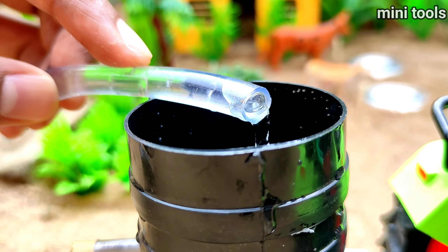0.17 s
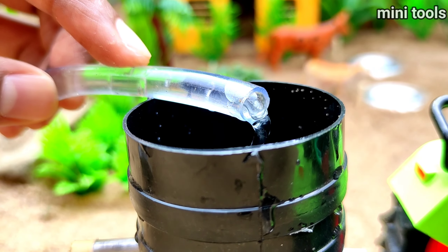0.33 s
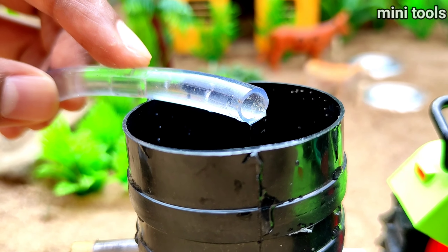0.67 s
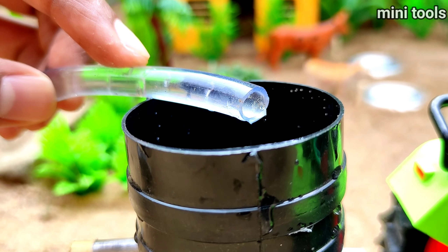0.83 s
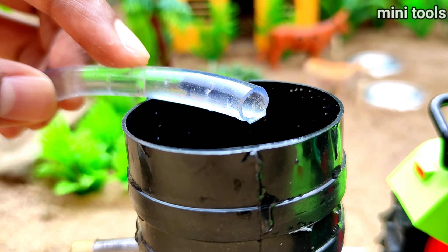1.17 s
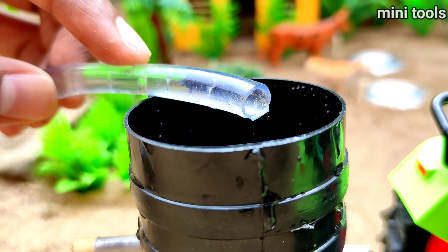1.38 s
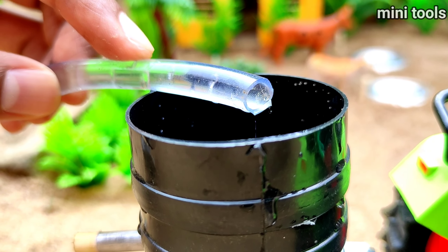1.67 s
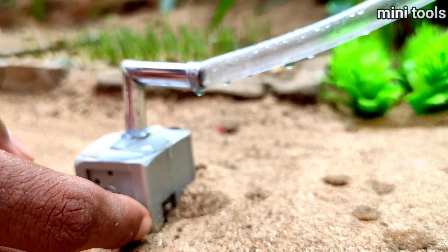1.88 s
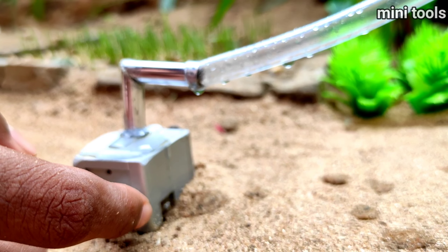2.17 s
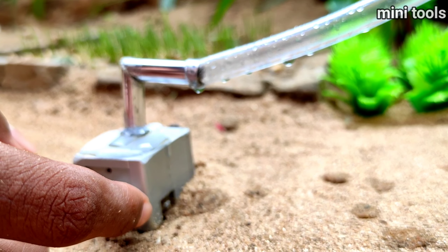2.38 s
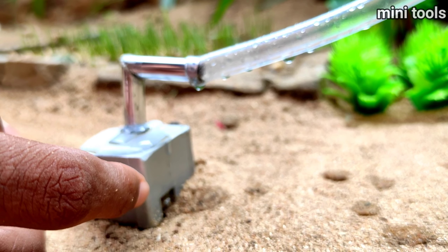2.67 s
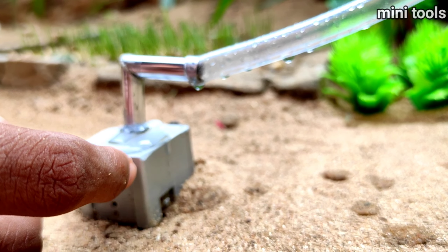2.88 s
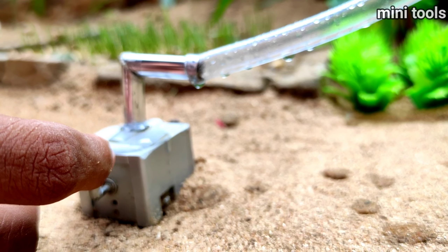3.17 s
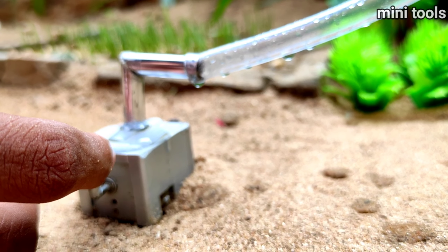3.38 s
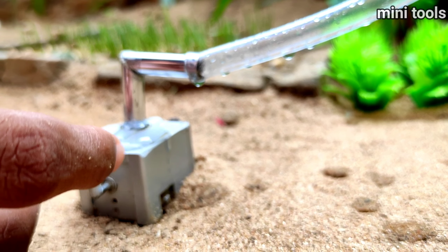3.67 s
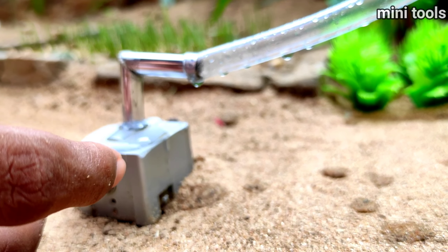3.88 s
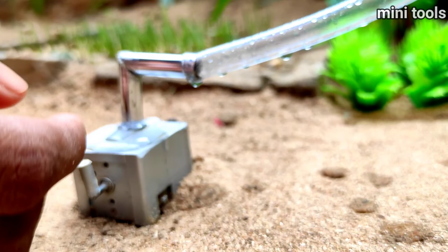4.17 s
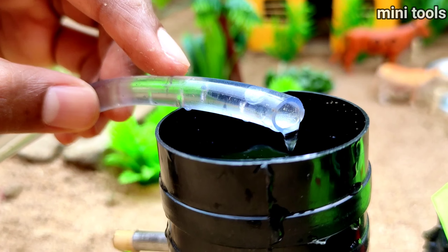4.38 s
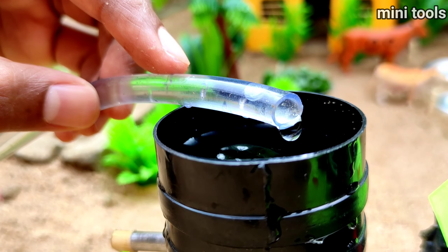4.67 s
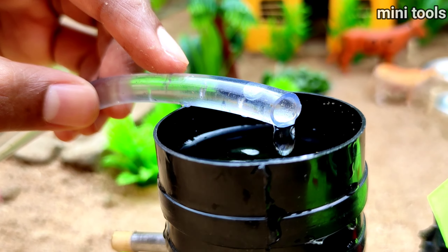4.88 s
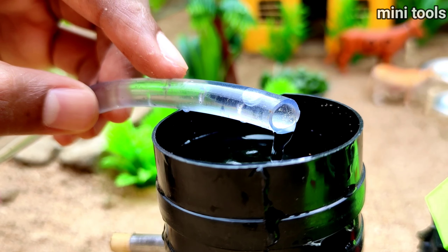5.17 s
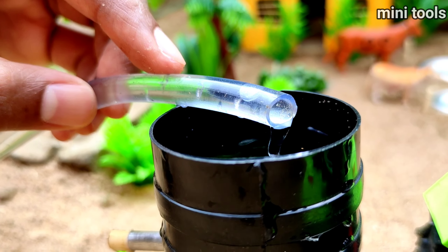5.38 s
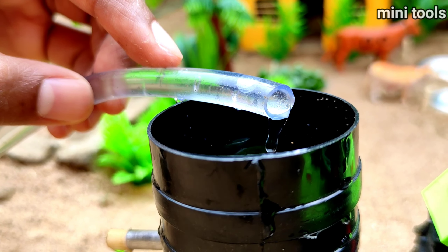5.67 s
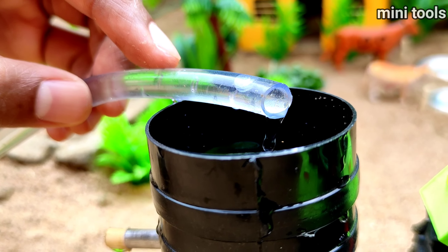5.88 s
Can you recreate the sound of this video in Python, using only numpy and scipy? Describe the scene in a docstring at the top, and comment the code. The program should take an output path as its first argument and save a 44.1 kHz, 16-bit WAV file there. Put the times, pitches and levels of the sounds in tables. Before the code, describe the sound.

Very close stereo sound of a thin water stream spurting into a small plastic tank. Bright plinks, quick bubbles and crisp droplet ticks tumble irregularly, with a short hollow ring. Gulps become deeper and fuller as the tank fills. Soft outdoor air and a faint low hum sit behind the first two seconds. After about four seconds everything fades to a barely audible trickle.

```python
"""Water spurts from a thin tube into a small plastic tank, close to a stereo microphone; it fades after four seconds.
Air bubbles are decaying sines that rise in pitch: large ones gulp, deeper and louder as the tank fills, small ones plink.
Droplets are short high rings with a noise snap and fizz. Damped air modes and noise echoes make the tank's hollow ring.
Behind: coloured outdoor noise, dull bumps, and a faint low hum and tones (sines) in about the first two seconds.
All dB values are relative levels within their layer."""
import sys
import numpy as np
from scipy import signal
from scipy.fft import rfft, irfft, next_fast_len
from scipy.io import wavfile
from scipy.ndimage import uniform_filter1d

SR = 44100
rng = np.random.default_rng(int(sys.argv[2]) if len(sys.argv) > 2 else 0)


def bounce(signal):
    """Save signal as a 16-bit WAV file at the path given by the first command-line argument."""
    frames = np.transpose(np.atleast_2d(signal))
    limited = np.clip(frames, -1, 1)
    pcm = np.round(limited * 32767).astype(np.int16)
    wavfile.write(sys.argv[1], SR, pcm)


N = 265790
TIME_S = np.arange(N) / SR


def amp(db):
    """Decibels to gain."""
    return 10 ** (np.asarray(db) / 20)


def unit(x):
    """Scales to rms 1."""
    return x / np.sqrt(np.mean(x ** 2) + 1e-20)


def curve(rows, t_s, column=1):
    """Reads one column of a table along time."""
    rows = np.asarray(rows)
    return np.interp(t_s, rows[:, 0], rows[:, column])


def read(points, hz):
    """Reads a spectrum on a log-frequency axis."""
    point_hz, value = np.transpose(points)
    return np.interp(np.log(hz + 1), np.log(point_hz + 1), value)


def add(mix, start_s, sound):
    """Mixes a sound in at start_s."""
    part = mix[max(round(start_s * SR), 0):][:len(sound)]
    part += sound[:len(part)]


def colour(x, points):
    """Filters by a spectrum in dB."""
    length = x.shape[-1]
    size = next_fast_len(length + 2048)
    gain = amp(read(points, np.fft.rfftfreq(size, 1 / SR)))
    return irfft(rfft(x, size) * gain, size)[..., :length]


def wobble(size):
    """A slow random waver of rms 1, smoothed twice over size samples."""
    smooth = uniform_filter1d(rng.standard_normal(N), size=size)
    return unit(uniform_filter1d(smooth, size=size))


# stream between splashes: (time [s], bubbling level [dB], spray level [dB])
STREAM_LEVEL = [(0, -38, -38.5), (0.6, -38, -44), (1.15, -36, -42), (1.55, -37, -39), (1.75, -35.5, -46.5),
                (2.05, -37.5, -48), (2.4, -38, -45), (3.05, -37, -42), (3.15, -41, -43.5),
                (3.72, -38.5, -43.5), (4.02, -42, -57), (4.29, -52.5, -55), (4.75, -55.5, -62.5),
                (5.15, -56.5, -65), (5.36, -63, -71), (5.55, -63.5, -73.5), (6.02, -68, -75)]
# typical pitch of large bubbles: (time [s], pitch [Hz])
GULP_PITCH_HZ = [(0, 1290), (1.1, 1140), (1.4, 1110), (2.2, 846), (3.1, 1018), (3.5, 802), (4.1, 775),
                 (4.5, 694), (6, 748)]
# typical pitch of bright plinks: (time [s], pitch [Hz])
BRIGHT_PITCH_HZ = [(0, 3120), (0.6, 2850), (1.5, 2814), (2.6, 3030), (3.4, 3100), (6, 3290)]
GULP_SWELL, PLINK_SWELL = 2.9, 1  # dB per dB of splash swell
SHALLOW_GULP_DB, DEEP_GULP_DB, FILL_S = -17.5, -3.5, 3.5  # deeper water traps more large bubbles
BRIGHT_DB, BLIPS_DB = -10.5, -11.5


def stream():
    """Slugs of water stir gulps, plinks, spray and mist; clear blips fall evenly; gulps grow as the tank fills."""
    drive = spurts(per_s=40, decay_s=0.0017, steady=0.29, slug=0.66)
    gulps = swarm(drive, curve(GULP_PITCH_HZ, TIME_S), octaves=0.787, cycles=3.8,
                  spread_db=3.5, rise=0.068, count=1700, size=1300)
    plinks = swarm(drive, 2031, octaves=2.004, cycles=4.2,
                   spread_db=2.5, rise=0.056, count=3200, size=750)
    bright = swarm(drive, curve(BRIGHT_PITCH_HZ, TIME_S), octaves=0.24, cycles=5.2,
                   spread_db=7.0, rise=0.023, count=1200, size=600, pinch=0.77)
    blips = swarm(np.ones(N), 1983, octaves=1.456, cycles=6.46,
                  spread_db=6.5, rise=0.05, count=560, size=1000, pinch=0.69)
    spray = swarm(drive, 6636, octaves=1.973, cycles=4.95,
                  spread_db=8.0, rise=0.15, count=7000, size=320)
    mist = port_noise(N, [(2500, 1.5), (4500, -1.0), (15000, -15.5)]) * drive
    spray_and_mist = unit(spray) + amp(0.5) * unit(mist)

    bubbling_swell_db, spray_swell_db = splashing()
    bubbling_db = curve(STREAM_LEVEL, TIME_S, column=1)
    depth_db = np.interp(TIME_S, [0, FILL_S], [SHALLOW_GULP_DB, DEEP_GULP_DB])
    gulp_db = bubbling_db + depth_db + GULP_SWELL * bubbling_swell_db
    plink_db = bubbling_db + PLINK_SWELL * bubbling_swell_db
    spray_db = curve(STREAM_LEVEL, TIME_S, column=2) + spray_swell_db
    return (pour(gulps, gulp_db, modes_db=5, echo_db=0.0)
            + pour(plinks, plink_db - 2.0, modes_db=2.5, echo_db=1.5)
            + pour(bright, plink_db + BRIGHT_DB, modes_db=-7, echo_db=-19.5)
            + unit(blips) * amp(plink_db + BLIPS_DB)
            + pour(spray_and_mist, spray_db, modes_db=-6, echo_db=2))


def spurts(per_s, decay_s, steady, slug):
    """The stream breaks into slugs; each hits at once and its churn decays. Each loud bubble has a slug."""
    chance, strength = rng.random((2, N))
    hits = (chance < per_s / SR) * strength
    hits[(np.array(LOUD_BUBBLES)[:, 0] * SR).astype(int)] = slug
    return steady + signal.lfilter([1], [1, -np.exp(-1 / (decay_s * SR))], hits)


# surges, some bubbling, some scattering: (time [s], length [s], bubbling swell [dB], spray swell [dB])
SURGES = [(0.163, 0.021, 2.5, -5), (0.32, 0.1, 2, 4.5), (0.646, 0.042, 5.5, -1), (0.977, 0.074, 3.5, 4.5),
          (1.059, 0.12, 1.5, 4.5), (1.447, 0.031, 4, 1.5), (1.532, 0.094, 1, 2.5), (1.842, 0.068, 3, 3.5),
          (2.139, 0.085, 1, 6.5), (2.307, 0.13, 1, 5), (2.468, 0.08, 2, 5.5), (2.714, 0.12, 1, 3.5),
          (3.052, 0.046, 0.5, 7.5), (3.394, 0.072, 2.5, 4.5), (3.52, 0.042, 3, 8.5), (3.85, 0.065, 1, 4),
          (4.605, 0.097, 3, 2.5), (4.768, 0.022, 0, 9.5), (5.077, 0.12, 1, -2.5), (5.438, 0.18, 1, 4),
          (5.822, 0.093, 2, 2)]
SPLASH_ATTACK_S, SPLASH_RELEASE_S = 0.0017, 0.0031


def splashing():
    """Bubbling and spray swells in dB: each splash changes both quickly, holds and dies away."""
    swell_db = np.zeros((2, N))
    for start_s, length_s, bubbling_db, spray_db in SURGES:
        age_s = TIME_S - start_s
        attack = np.clip(age_s / SPLASH_ATTACK_S, 0, 1)
        release = np.exp(-np.clip((age_s - length_s) / SPLASH_RELEASE_S, 0, 20))
        swell_db += np.outer([bubbling_db, spray_db], attack * release)
    return swell_db


def bubble(t_s, hz, ring_s, rise, pinch=0.53):
    """A bubble swells, rings out, and rises in pitch as it nears the surface: by share rise per ring time."""
    age = t_s / ring_s
    swell = 1 - np.exp(-(t_s / (pinch * ring_s + 0.036 / hz)) ** 2)
    cycles = hz * t_s * (1 + rise * (np.minimum(age, 6) / 2 - 1))
    return swell * np.exp(-age) * np.sin(2 * np.pi * cycles)


SCATTER = 0.28  # left-right spread


def swarm(drive, pitch_hz, octaves, cycles, spread_db, rise, count, size, pinch=0.32):
    """Many small bubbles of chance level, pitch, damping and place, scaled by the drive at their onset."""
    when, smallness, strength, damping, place, glide = rng.random((count, 6)).T[:, :, None]
    start = (when * N).astype(int)
    hz = (pitch_hz * np.ones(N))[start] * 2 ** (octaves * (smallness - .5))
    height = drive[start] * amp(spread_db * np.minimum(-np.log(1 - strength), 3))
    fade = np.cos(np.linspace(0, np.pi / 2, size))  # no click at the end
    ring_s = cycles * (.5 + damping) / hz
    rings = height * fade * bubble(np.arange(size) / SR, hz, ring_s, 2 * rise * glide, pinch)
    at = (start + np.arange(size)).ravel()
    pan = SCATTER * (place - .5)
    return np.array([np.bincount(at, (rings * (1 + side * pan)).ravel(), N)[:N] for side in (-1, 1)])


# colour of churning water: (frequency [Hz], level [dB])
CHURN_COLOUR = [(60, -56), (300, -8.5), (560, -12.5), (680, -5.5), (900, -6), (990, -6), (1100, -7),
                (1550, -2), (2000, 4), (2400, -4), (2850, 1.5), (3300, 2.5), (3550, -3), (4300, 1.5),
                (5600, 6), (9000, 8.5), (12500, 7), (15500, 8.5)]


def pour(water, level_db, modes_db, echo_db):
    """Rings the water in the tank, evens its slow power, then sets its level curve."""
    wet = tank(colour(water, CHURN_COLOUR), modes_db, echo_db, echo_t60_s=0.014)
    power = (wet ** 2).mean(0)
    for _ in range(2):
        power = uniform_filter1d(power, size=3600)
    return wet / np.sqrt(abs(power) + 1e-12) * amp(level_db)


# air modes of the tank: (frequency [Hz], level [dB], t60 [s])
TANK_MODES = [(632, -16, 1), (681.7, 6, 0.15), (735, 0.5, 0.14), (776.3, 1, 0.072), (904, 3.5, 0.25),
              (1083, 4.5, 0.13), (1505, 5.5, 0.13), (1987, -0.5, 0.05), (2353, 5, 0.075), (2471, 7.5, 0.09)]
# colour of scattered echoes: (frequency [Hz], level [dB])
ECHO_COLOUR = [(100, -6), (600, -8.5), (3200, -1.5), (7000, -2), (15000, -4.5)]


def tank(x, modes_db, echo_db, echo_t60_s):
    """Direct sound, damped air modes, and noise echoes that change as the surface heaves."""
    x, t_s = np.atleast_2d(x), np.arange(SR // 5) / SR
    ringing = np.zeros(len(t_s))
    for hz, db, t60_s in TANK_MODES:
        per_sample = 2 * np.log(1000) / (t60_s * SR)
        ringing += amp(db - 60 * t_s / t60_s) * np.cos(2 * np.pi * hz * t_s) * per_sample
    out = x + signal.oaconvolve(x, (amp(modes_db) * ringing)[None], axes=1)[:, :N]
    # three echo patterns trade places at 2 Hz, a third of a turn apart
    for share in np.sin(2 * np.pi * (2 * TIME_S + np.arange(3)[:, None] / 3)):
        decay = amp(-60 * t_s / echo_t60_s) + amp(-15.5 - 60 * t_s / 0.18)
        echoes = port_noise(len(t_s), ECHO_COLOUR) * decay * np.minimum(t_s / 0.002, 1)
        echoes = amp(echo_db) * echoes / np.linalg.norm(echoes[0])
        out = out + signal.oaconvolve(x * share, echoes, axes=1)[:, :N]
    return out


# likeness of the two microphone ports: (frequency [Hz], correlation [0-1])
PORT_LIKENESS = [(60, 0.76), (300, 0.46), (700, 0.96), (3000, 1), (5000, 0.58), (8000, 0.06), (15000, 0.84)]


def port_noise(size, points):
    """Coloured noise as the two ports hear it: partly alike."""
    hz = np.fft.rfftfreq(size, 1 / SR)
    a, b = rfft(rng.standard_normal((2, size)))
    alike = np.clip(read(PORT_LIKENESS, hz), -1, 1)
    ports = np.array([a, alike * a + np.sqrt(1 - alike ** 2) * b])
    return unit(irfft(ports * amp(read(points, hz)), size))


# single loud bubbles: (time [s], level [dB], pitch [Hz], ring time [s])
LOUD_BUBBLES = [(.0499, -21.5, 3260, 0.003), (.0735, -24, 3420, 0.0046), (.1, -23, 3020, 0.0084),
                (.1171, -28, 3040, 0.0032), (.159, -23, 1620, .005), (.162, -34.5, 1068, 0.016),
                (.3014, -22.5, 2890, 0.0019), (.3345, -25.5, 2870, 0.0034), (.338, -34, 918, 0.0049),
                (.352, -29.5, 780, 0.005), (.433, -32, 1075, 0.0067), (.441, -27, 2030, 0.0067),
                (.652, -22, 1120, 0.0047), (.655, -24.5, 2050, 0.0087), (.7646, -21, 1520, 0.0037),
                (.8502, -13.5, 1950, 0.0023), (.8645, -22, 2630, 0.00069), (.919, -36, 1060, 0.013),
                (.9597, -22, 2740, 0.0015), (1.017, -20.5, 2620, 0.0021), (1.0988, -28.5, 1044, 0.013),
                (1.2212, -12.5, 2800, 0.00079), (1.338, -25, 1062, 0.011), (1.3385, -25, 2980, 0.0034),
                (1.355, -31, 730, 0.012), (1.4025, -25, 763, 0.012), (1.446, -26, 2090, 0.0022),
                (1.4577, -18.5, 2890, 0.0041), (1.523, -25.5, 2820, 0.0035), (1.5544, -16, 1870, 0.0012),
                (1.579, -27, 2140, 0.0031), (1.582, -28, 1040, .005), (1.6485, -20, 2630, .0008),
                (1.67, -23, 2120, .0018), (1.7693, -17.5, 3090, 0.0015), (1.8227, -17, 2920, 0.0049),
                (1.8472, -19, 2070, 0.0017), (1.856, -30, 771, 0.0044), (1.874, -27, 740, 0.0017),
                (1.926, -34, 904, 0.013), (2.163, -31, 897, 0.0094), (2.1885, -9, 3040, 0.0015),
                (2.189, -30.5, 918, 0.011), (2.218, -33.5, 708, 0.011), (2.3605, -22, 1870, 0.0025),
                (2.427, -33, 2213, 0.003), (2.4527, -22, 3065, 0.0026), (2.528, -28, 1020, 0.014),
                (2.561, -30, 846, 0.013), (2.619, -26, 2180, .003), (2.66, -18.5, 3020, 0.0012),
                (2.687, -25.5, 897, 0.0086), (2.724, -22.5, 896, 0.0076), (2.739, -30.5, 872, 0.021),
                (2.868, -23.5, 800, 0.0031), (2.8959, -18, 3270, .0025), (2.985, -31, 2240, .005),
                (3.0525, -24, 2720, 0.0016), (3.144, -30, 1040, .009), (3.301, -24.5, 750, 0.0051),
                (3.331, -17, 3120, 0.0014), (3.374, -23, 750, 0.0088), (3.396, -26.5, 800, .0054),
                (3.5205, -19.5, 748, 0.0065), (3.568, -27, 788, 0.0055), (3.5875, -25, 3000, .006),
                (3.625, -10.5, 3060, 0.00076), (3.642, -21, 743, 0.0073), (3.7217, -21.5, 1720, 0.0044),
                (3.7428, -22.5, 823, 0.0044), (3.8545, -28.5, 700, 0.006), (3.8845, -27.5, 697, 0.0099),
                (3.9093, -24, 3100, .0013), (3.932, -29.5, 817, 0.0075), (3.9343, -21, 2130, 0.0018),
                (4.0245, -29, 2860, 0.0025), (4.091, -31, 877, 0.0073), (4.111, -33, 945, 0.014),
                (4.231, -34.5, 1990, 0.0034), (4.364, -43.5, 748, 0.012), (4.58, -44, 2051, 0.0031),
                (4.625, -43.5, 703, 0.014), (4.667, -40.5, 720, 0.0052), (4.758, -43, 1870, 0.0026),
                (4.799, -45, 2020, 0.0036), (4.8665, -41, 3170, 0.0019), (4.8868, -42, 726, .01),
                (5.1, -45.5, 726, 0.011), (5.117, -29.5, 2380, 0.00081), (5.2608, -44, 2880, 0.0017),
                (5.559, -46, 3370, 0.0043), (5.653, -48, 1830, .0023), (5.831, -51, 2200, 0.0025)]
BUBBLE_RISE, PINCH_S = 0.033, 0.00088  # pitch share per ring time; pinch-off time
PLOP_BELOW_HZ, PLOP_DB, PLOP_RATIO, PLOP_S = 1200, -4.5, 0.593, 0.0011


def loud_bubbles():
    """Air pockets pinch off, ring and rise; behind large ones the cavity collapses with a short, lower plop."""
    out, t_s = np.zeros(N), np.arange(SR // 16) / SR
    for start_s, db, hz, ring_s in LOUD_BUBBLES:
        tone = bubble(t_s, hz, ring_s, BUBBLE_RISE, pinch=PINCH_S / ring_s)
        sound = tone / abs(tone).max()
        if hz < PLOP_BELOW_HZ:
            sound = sound + amp(PLOP_DB) * bubble(t_s, hz * PLOP_RATIO, PLOP_S, rise=0.05)
        add(out, start_s, amp(db) * sound)
    return amp(-2.0) * tank(out, modes_db=-2, echo_db=-9, echo_t60_s=0.025)


# droplets on the surface: (time [s], level [dB], pitch [Hz])
DROPLET_HITS = [(.143, -38.5, 7650), (.198, -37, 10350), (.223, -33, 7750), (0.3691, -30.5, 7800),
                (0.4098, -36, 8900), (0.49, -36, 9450), (0.518, -40, 7800), (.56, -37.5, 9000),
                (0.6816, -32, 9600), (0.8708, -34.5, 6220), (0.9567, -29, 6750), (1.1436, -34.5, 6240),
                (1.166, -35.5, 6900), (1.245, -37.5, 7300), (1.2595, -41, 8160), (1.4886, -33, 6180),
                (1.6245, -33.5, 9540), (1.7717, -37, 10100), (1.8052, -34.5, 9300), (1.9055, -30.5, 9960),
                (2.041, -37, 8600), (2.278, -34, 6270), (2.3603, -31, 8300), (2.384, -34.5, 6600),
                (2.426, -33.5, 8160), (2.4731, -32, 6280), (2.5308, -38, 6730), (2.6675, -29, 8000),
                (2.8662, -32.5, 7500), (2.888, -36, 9000), (3.0386, -36, 5130), (3.0498, -33, 5200),
                (3.2736, -27.5, 8500), (3.371, -37.5, 6860), (3.3979, -31.5, 5600), (3.542, -42, 6300),
                (3.7438, -40.5, 5700), (3.854, -39, 8660), (4.2338, -56, 7240), (4.439, -49.5, 6700),
                (4.6808, -57.5, 5960), (4.8878, -51.5, 9550), (4.9242, -56.5, 6000), (5.4125, -56.5, 10500),
                (5.751, -57.5, 8460), (5.843, -58.5, 9200)]
# colour of droplets: (frequency [Hz], level [dB])
DROPLET_COLOUR = [(200, -25.5), (3000, 0), (5500, 2), (10000, 3.5), (13000, 0.5)]
DROPLET_CYCLES = 4.3  # ring time in cycles
SNAP_DB, SNAP_S, FIZZ_DB, FIZZ_S = -8, 0.00044, -19, 0.0044


def droplets():
    """A droplet snaps on the surface and rings; a short noise fizz swells and dies behind it."""
    out, t_s = np.zeros(N), np.arange(SR // 25) / SR
    age = t_s / FIZZ_S
    snap_and_fizz = amp(SNAP_DB) * np.exp(-t_s / SNAP_S) + amp(FIZZ_DB) * age * np.exp(-age)
    for start_s, db, hz in DROPLET_HITS:
        ring = bubble(t_s, hz, DROPLET_CYCLES / hz, rise=0.13)
        noise = snap_and_fizz * rng.standard_normal(len(t_s))
        add(out, start_s, amp(db) * (ring + noise))
    out = colour(out, DROPLET_COLOUR)
    return amp(17.5) * tank(out, modes_db=-13, echo_db=-4, echo_t60_s=0.012)


# soft handling bumps: (time [s], level [dB])
HANDLING_BUMPS = [(0.18, -60), (0.46, -58), (3.169, -52)]
# colour of the bumps: (frequency [Hz], level [dB])
BUMP_COLOUR = [(100, -30), (200, -5), (245, -1), (310, -2), (600, -20), (1500, -70)]
BUMP_S = 0.015  # time to peak


def bumps():
    """Dull noise bumps from handling, inverted and weaker at the right port."""
    out, t_s = np.zeros(N), np.arange(SR // 5) / SR
    age = t_s / BUMP_S
    for start_s, db in HANDLING_BUMPS:
        thud = unit(colour(rng.standard_normal(len(t_s)), BUMP_COLOUR))
        add(out, start_s, amp(db) * age * np.exp(1 - age) * thud)
    return out * np.array([[1], [-.4]])


# hum: (time [s], pitch [Hz], level [dB])
HUM_TRACK = [(.12, 178.7, -73), (.24, 188, -57), (.84, 184.5, -60.5), (1.06, 189.5, -82),
             (1.24, 187, -56.5), (1.4, 187, -61), (1.78, 187, -58.5), (1.92, 169.3, -69), (2.1, 173, -65),
             (2.25, 169, -77)]
# faint tones: (start [s], end [s], pitch [Hz], level [dB])
FAINT_TONES = [(0.187, 0.443, 291.6, -56), (0.606, 0.73, 290, -55.5), (0.755, 0.944, 290, -57),
               (0.955, 1.593, 321.6, -64), (1.456, 1.82, 374, -63)]
HUM_WAVER_DB, TONE_WAVER_HZ = 2, 2.5  # rms


def hum_and_tones():
    """A wavering low sine with a weak octave comes and goes beside short faint sines; all waver in level."""
    turn = 2 * np.pi * np.cumsum(curve(HUM_TRACK, TIME_S) + 2.6 * wobble(size=1200)) / SR
    hum = amp(curve(HUM_TRACK, TIME_S, column=2)) * (np.sin(turn) + amp(-18.0) * np.sin(2 * turn))
    hum = hum * (TIME_S < HUM_TRACK[-1][0])
    tones = np.zeros(N)
    for start_s, end_s, hz, db in FAINT_TONES:
        size = round((end_s - start_s) * SR)
        turn = 2 * np.pi * np.cumsum(hz + TONE_WAVER_HZ * wobble(size=900)[:size]) / SR
        add(tones, start_s, amp(db) * np.sin(turn) * signal.windows.tukey(size, .8))
    left_right_gain = amp([[3], [-2]])
    return (hum * left_right_gain + tones) * amp(HUM_WAVER_DB * wobble(size=1500) - 2.0)


# colour of outdoor air: (frequency [Hz], level [dB per Hz])
AIR_COLOUR = [(20, -7), (60, -8.5), (120, -1.5), (230, 1.5), (330, -2), (600, 8), (2000, 5.5),
              (16000, -12.5)]
# level of outdoor air: (time [s], level [dB])
AIR_TRACK = [(0, -49), (.25, -49.5), (1.5, -49.5), (2.1, -53.5), (3.05, -51), (3.4, -47), (3.85, -51),
             (4.05, -63), (4.6, -70.5), (5.2, -72.5), (6, -79)]


def outdoor_air():
    """Coloured noise with a lumpy level."""
    return port_noise(N, AIR_COLOUR) * amp(curve(AIR_TRACK, TIME_S) + 3.6 * wobble(size=900))


def scene():
    """Water in the tank over the background."""
    return stream() + loud_bubbles() + droplets() + bumps() + hum_and_tones() + outdoor_air()


# phase lag of the right port: (frequency [Hz], phase [rad])
PORT_LAG = [(3500, 0.25), (5200, 0.19), (6300, 0.98), (7300, 1.35), (8300, 0.88), (11500, 2.59),
            (16000, 3.7)]
EDGE_HZ = 15940


def record(dry):
    """Colours the left port, lags the right in phase, mostly in the treble, then low-passes both."""
    size = next_fast_len(N + 2048)
    lag = np.exp(-1j * read(PORT_LAG, np.fft.rfftfreq(size, 1 / SR)))
    left = colour(dry[0], [(200, 0.42), (700, -0.63), (4000, -0.18), (8000, -1.0)])
    right = irfft(rfft(dry[1], size) * lag, size)[:N] * amp(0.26)
    low_pass = signal.firwin(511, EDGE_HZ, window=("kaiser", 9), fs=SR)
    return signal.oaconvolve(np.array([left, right]), low_pass[None], "same")


dry = scene()
out = record(dry)
bounce(out)
```